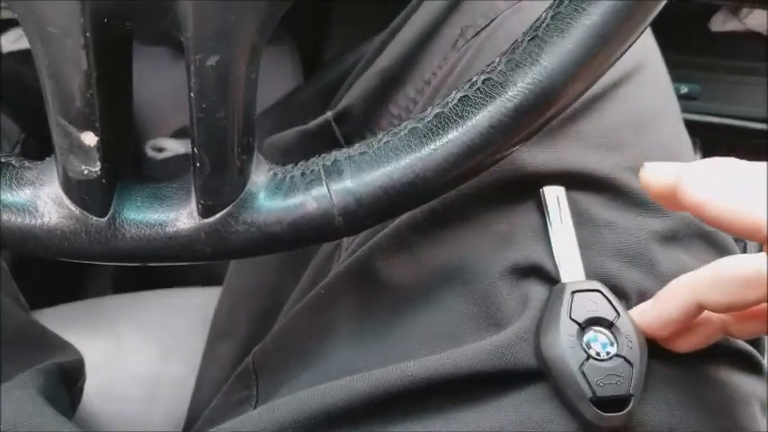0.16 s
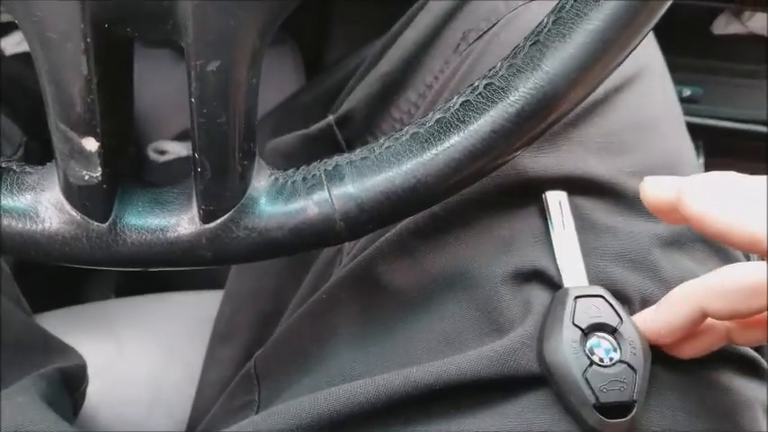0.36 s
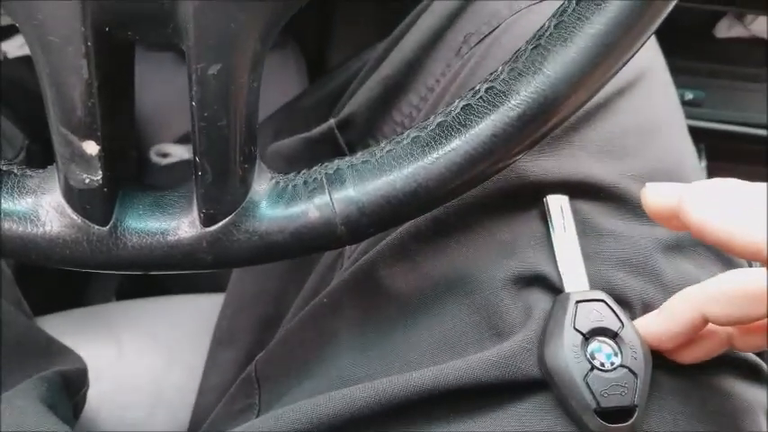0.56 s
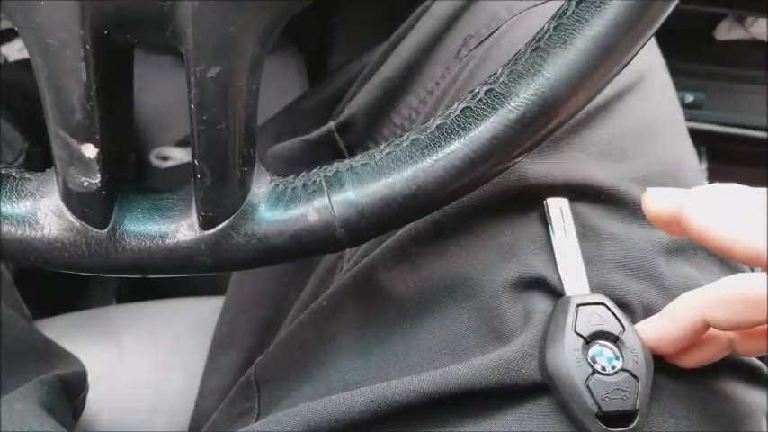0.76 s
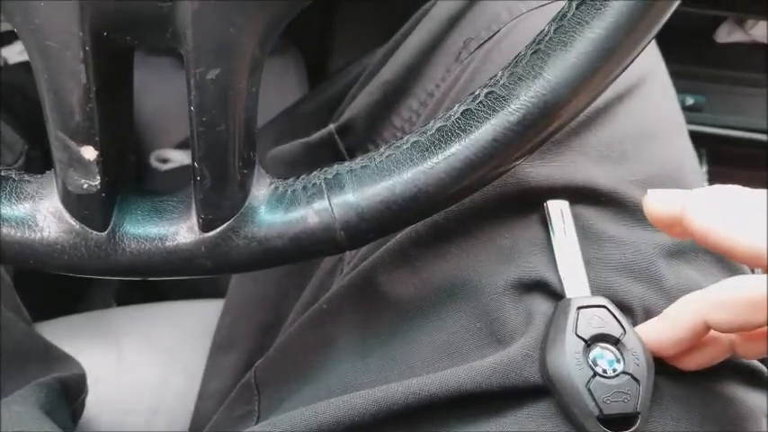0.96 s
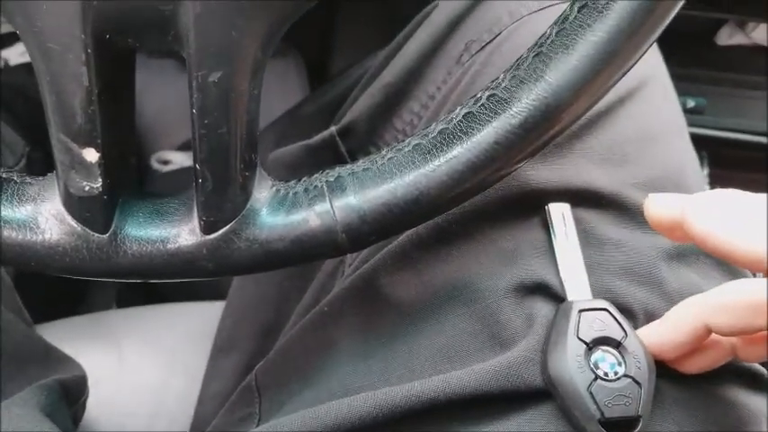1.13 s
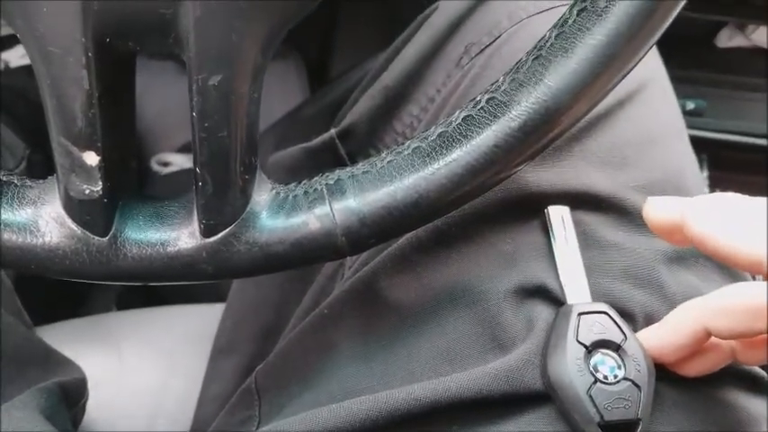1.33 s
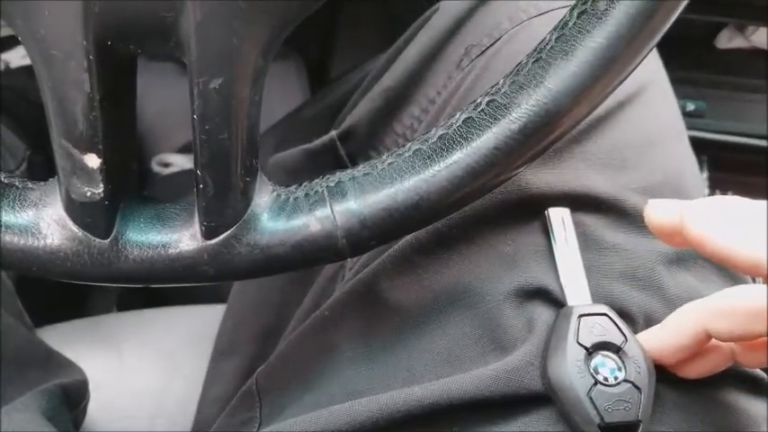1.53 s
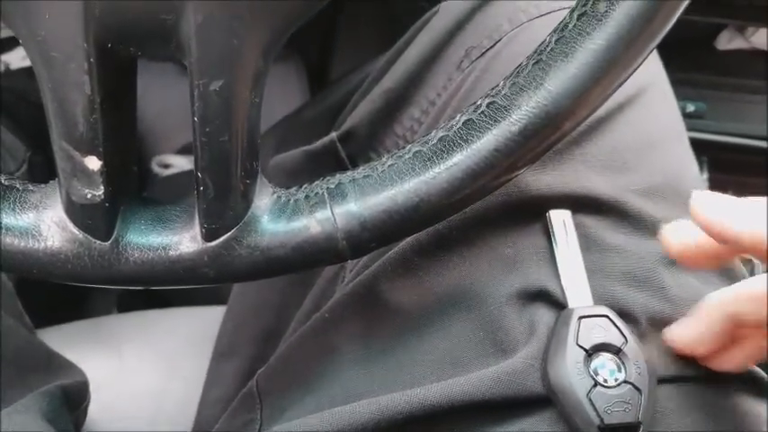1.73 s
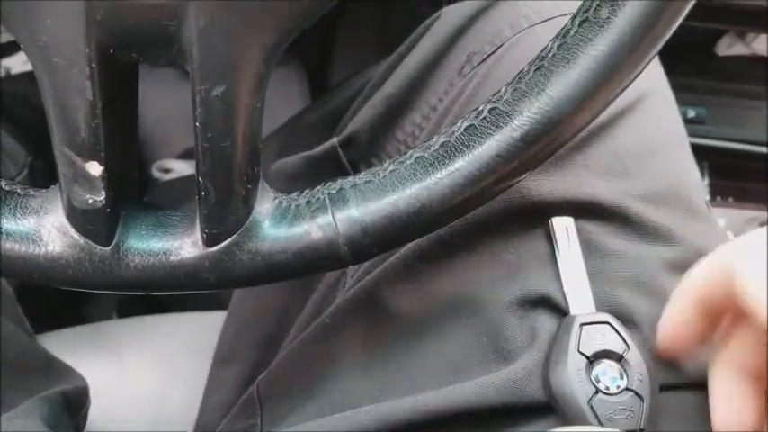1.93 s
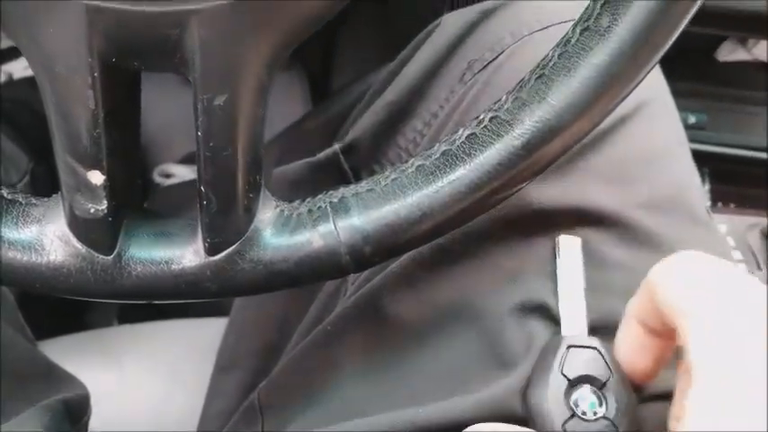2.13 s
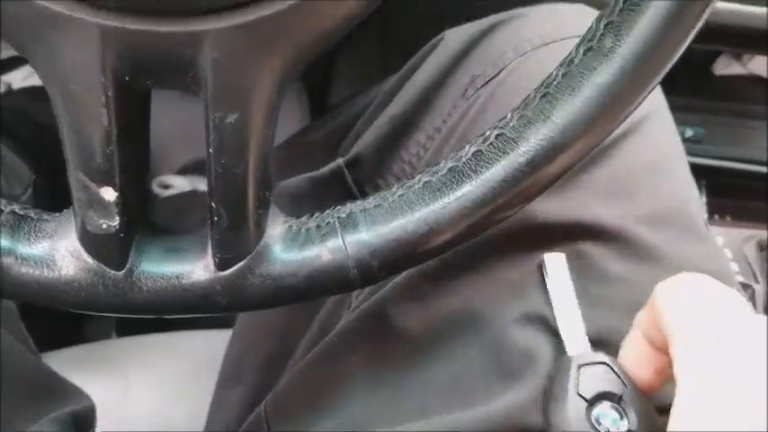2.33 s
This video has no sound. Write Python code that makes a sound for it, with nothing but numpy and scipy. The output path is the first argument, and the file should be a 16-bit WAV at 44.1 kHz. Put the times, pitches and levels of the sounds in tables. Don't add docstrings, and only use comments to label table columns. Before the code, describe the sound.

Car central locking heard inside the parked cabin: faint relay clicks, a brief motor whirr and hard overlapping latch clunks with a door-panel boom, two small clicks, then close cloth rustling and a light key tap.

```python
import sys
import numpy as np
from scipy import signal
from scipy.fft import rfft, irfft, next_fast_len
from scipy.io import wavfile
from scipy.ndimage import uniform_filter1d, map_coordinates

SR = 44100
rng = np.random.default_rng(int(sys.argv[2]) if len(sys.argv) > 2 else 0)


def elevation(decibels):
    levels = np.asarray(decibels, float)
    return 10 ** (levels / 20)


def put_to_file(sound):
    columns = np.atleast_2d(sound).T
    safe = np.clip(columns, -1, 1)
    whole_steps = np.round(safe * 32767)
    wavfile.write(sys.argv[1], SR, whole_steps.astype(np.int16))


N = 109809
SIDES = np.array([[.5], [-.5]])
TOP_HZ = 15850
LEAD_S = 0.000345

# freq_hz, level_db (per Hz)
RUMBLE = [(30, -14), (55, 2.5), (85, -1.5), (118, -1), (170, -3), (230, -15), (450, -17), (800, -44)]
HISS = [(500, -3), (1500, -1), (2500, -3), (6000, -6), (10000, -6.5), (13500, -1.5), (15500, -6)]
# freq_hz, likeness (-1 to 1)
RUMBLE_ALIKE = [(60, 0.9), (180, 0.88), (550, 0.38), (1650, -0.01), (4970, -0.1), (15000, -0.14)]
# freq_hz, left_over_right_db
RUMBLE_LEFT = [(50, 4.5), (115, -0.5), (190, 6.5), (330, -1), (600, 3.5)]

# start_s, rub_db, press_db, left_over_right_db
STROKES = [
    [(1.52, -88.5, -6, 3), (1.562, -75, -13, 6), (1.6, -53.5, -32.5, 4), (1.62, -53.5, -16, 5),
     (1.682, -54, -13, 5), (1.722, -76.5, -8, 7.5), (1.78, -92, -13, -1)],
    [(1.8, -81, -9, -4), (1.804, -94, 3, 9), (1.846, -57.5, -17.5, 4.5), (1.916, -58.5, -23.5, 9.5),
     (1.934, -65.5, -12, 8.5), (1.952, -52.5, -16.5, 6), (2.012, -57, -11, 11.5), (2.08, -70.5, -10, 4.5)],
    [(2.08, -78, -7, 13), (2.108, -62, -15, 8), (2.196, -55.5, -2, 12.5), (2.224, -57, -4, 10.5),
     (2.312, -54.5, -7.5, 12), (2.384, -55.5, -11.5, 6.5), (2.436, -62, -33, 11), (2.49, -72.5, -1, 1.5)],
]
# freq_hz, level_db (per Hz)
BRUSH = [(500, -14), (1300, -15), (2500, -11), (3800, -0.5), (6000, -0.5), (10300, -3.5), (12500, -22.5)]
DRAG = [(900, -75), (1350, 2), (2200, 1.5), (3500, -3), (5000, -22)]
SHEEN = [(9000, -29), (11500, 0.5), (15000, -0.5)]
# freq_hz, left_over_right_db
BRUSH_LEFT = [(600, -0.5), (1700, 9), (2600, 6), (4300, 11), (6000, 3.5), (10000, -3), (12000, 10.5),
              (14500, 20)]

# start_s, level_db, tilt_db_per_octave, ring_db, t60_s
NUDGES = [
    (1.693, -71, -3, -14.5, 0.063),
    (1.842, -71, -1, 2.5, 0.26),
]
# freq_hz, level_db, t60_s
KEY = [(730, 1.5, .14), (782, 0, 0.1), (1730, 4, 0.076)]
# start_s, level_db, tilt_db_per_octave, ring_db, t60_s
CLICKS = [
    [(.1, -53.5, -1.26, -9.5, 0.2), (.128, -59, -2.5, -23, 0.156), (.368, -62, 1, -37, 0.035)],
    [(1.099, -52, -1.5, -9, 0.16)],
    [(1.127, -47, -5, -12, 0.11)],
]
# freq_hz, level_db, t60_s
RELAYS = [
    [(963, 9, .06), (2330, 1, 0.097), (2860, 1, 0.062), (3660, 1.5, 0.032), (7140, 4, 0.04)],
    [(1300, 3, 0.057), (2450, 8, 0.057), (2580, 12, 0.076), (3640, -15, 0.039), (5380, -4.5, 0.075),
     (7530, -4.5, 0.074)],
    [(600, 10.5, 0.054), (1270, 7.5, 0.073), (1550, 6, 0.053), (2620, 1, 0.11), (1030, -9, .04)],
]
# freq_hz, level_db (per Hz)
TICK = [(300, 1), (1000, -5), (3500, -14), (4300, -16), (10000, -20), (14500, -11.5)]

# start_s, level_db, tilt_db_per_octave, ring_db, t60_s
JOLTS = [
    (.604, -48.5, -1, -33, 0.19),
    (.614, -39.5, -3.5, -0.5, .2),
    (.625, -39, -4, -10, 0.11),
    (.648, -45, -5, -21.5, 0.75),
    (.739, -37, -7.5, -7.5, 0.14),
]
# freq_hz, level_db, t60_s
GEARS = [(480, 0.5, .05), (890, -4.5, 0.035), (1340, 3, .03), (1660, 5.5, 0.028), (1950, -3, 0.039),
         (2330, -0.5, 0.014)]

# start_s, main_hz, main_db, upper_db, free_ringing_s
PUSHES = [(-.03, 184.5, -40.5, -69, 0.32), (0.093, 192.5, -37, -55, 0.037), (0.128, 169, -56, -53.5, 0.078),
          (0.613, 174, -34.5, -47.5, 0.027), (0.646, 186.7, -38, -58, 0.034),
          (0.675, 195, -21, -34.5, .026), (.704, 184, -36, -39, 0.12), (.744, 189.6, -39, -31, 0.026),
          (.764, 163.5, -32, -34, 0.034), (0.798, 200.2, -31.5, -29, 0.054),
          (.835, 179.7, -37.5, -43, 0.043), (0.937, 206, -49.5, -64, 0.021),
          (0.973, 176.6, -49, -67.5, 0.03), (1.096, 190.4, -39, -51, 0.023),
          (1.107, 187, -38.5, -48, 0.018), (1.134, 175.7, -44.5, -55.5, 0.041)]
# freq_hz, level_db, t60_s
LOW_MODES = [(73, -12, 0.16), (111.4, 6, 0.09)]
UPPER_MODES = [(360.6, 1.5, 0.19), (487.2, 1, 0.067), (650, -4, 0.063), (694, -7.5, 0.03)]

# start_s, level_db, tilt_db_per_octave, ring_db, t60_s
BLOWS = [
    [(.673, -30.5, -1, 0.5, 0.1), (.689, -42, 2, -5.5, .09)],
    [(.745, -20, -1, -4, 0.071), (.755, -30.5, 2, -17, 0.088), (.764, -38, -2.5, -6.5, 0.14)],
    [(.799, -28, 0, -1.5, 0.084), (.857, -41, -9, -7, 0.064)],
]
# freq_hz, level_db, t60_s
LATCHES = [
    [(470, -2, 0.11), (667, -4.5, .05), (1055, -16, 0.075), (1574, -5.5, 0.024), (1589, 5, 0.059),
     (2440, -19, .1), (3505, -3.5, 0.064), (4802, -23.5, .07), (5534, -10, 0.06), (7140, -15, 0.06)],
    [(704, -5.5, 0.056), (1066, -5.5, .06), (1263, 2, 0.041), (1590, -0.5, 0.049), (1703, -0.5, 0.07),
     (1810, -12, .06), (2080, -8.5, .04), (3187, -15.5, .07), (3480, 6.5, 0.023), (4340, -9, .06),
     (4818, -2.5, 0.037), (6220, -15.5, 0.079)],
    [(774, -3, 0.078), (1090, -6, 0.049), (1579, 3, 0.039), (1780, -12.5, 0.085), (2220, -22, 0.089),
     (2870, -20, 0.057), (3220, -9, 0.028), (3410, -16, .04), (5362, -19, 0.078), (5980, -24.5, 0.08)],
]
MUFFLED_DB = [-7, 0.5, -3.5]
# freq_hz, level_db (per Hz)
CLATTER = [(250, -1), (550, -4), (1300, 0), (2300, -7), (4700, -10.5), (8500, -15.5), (10800, -25),
           (15000, -23.5)]
# freq_hz, left_over_right_db
LATCH_LEFT = [(300, -3), (900, 0), (1250, 5), (1700, 4), (2500, 4), (4400, 3.5), (9500, -4), (14000, 9.5)]
RING_LEFT = [(480, 2), (720, 3.5), (1180, -7.5), (1570, 6.5), (2000, 10.5), (2600, 2), (3500, 13),
             (4900, 0.5)]
# freq_hz, likeness (-1 to 1)
LATCH_ALIKE = [(250, 1), (500, 0.98), (1300, 0.73), (2500, 0.18), (6000, 0.22)]
# freq_hz, lead_radians
LATCH_TURN = [(480, 1), (700, 1.7), (1066, 2.5), (1560, 0.25), (1700, 3.2), (2600, -2.25), (3050, 0.5),
              (5000, 2.1)]

# freq_hz, t60_s
ECHO = [(100, 0.55), (200, 0.36), (350, 0.23), (600, 0.2), (2000, 0.14), (8000, 0.11)]


def unit(x):
    return x / np.sqrt(np.mean(x ** 2) + 1e-20)


def along(points, hz):
    f, v = np.transpose(points)
    return np.interp(np.log(hz + 1), np.log(f + 1), v)


def wobble(rate, size):
    knots = rng.standard_normal(int(size / SR * 2000) + 9)
    return map_coordinates(knots, [np.arange(size) * min(rate, 1900) / SR])


def noise(size, spectrum, alike, left, tilt_db=0, lead=0):
    m = next_fast_len(size + 4096)
    hz = np.fft.rfftfreq(m, 1 / SR)
    a, b = rfft(rng.standard_normal((2, m)))
    u = np.arccos(np.clip(along(alike, hz), -1, 1)) / 2
    low_edge = [(spectrum[0][0] / 2, -120)]
    high_edge = [(TOP_HZ, spectrum[-1][1]), (TOP_HZ + 300, -120)]
    colour_db = along(low_edge + list(spectrum) + high_edge, hz)
    gain = elevation(colour_db + tilt_db * np.log2((hz + 1) / 2000) + SIDES * along(left, hz))
    advance = np.exp(2j * np.pi * hz * SIDES * lead)
    pair = np.cos(u) * a + 2 * SIDES * np.sin(u) * b
    return unit(irfft(gain * advance * pair, m)[:, :size])


def patchy(x, depth_db):
    z = signal.stft(x, nperseg=512)[2]
    field = uniform_filter1d(rng.standard_normal(z.shape), size=10, axis=1)
    field = uniform_filter1d(field, size=10, axis=2)
    return unit(signal.istft(z * elevation(depth_db * unit(field)), nperseg=512)[1][:, :N])


def add(out, s, sound):
    i = round((s + 1) * SR)
    out[:, i:i + sound.shape[1]] += sound


def ringing(modes, t, phase, scatter_db):
    total = 0
    for k, (hz, db, t60) in enumerate(modes):
        total = total + elevation(db + scatter_db[k] - 60 * t / t60) * np.sin(2 * np.pi * hz * t + phase[k])
    return total


def strikes(rows, colour, modes, rise_s, rattle_db):
    ring_rise_s, high_dies = 0.0037, 0.13
    out, t = np.zeros((2, N + 2 * SR)), np.arange(SR // 4) / SR
    hz = np.array([m[0] for m in modes])
    for s, db, tilt_db, ring_db, t60 in rows:
        burst = noise(len(t), colour, LATCH_ALIKE, LATCH_LEFT, tilt_db, LEAD_S)
        burst = burst * elevation(rattle_db * wobble(350, len(t)))
        dull = uniform_filter1d(burst, size=5, axis=1)
        burst = dull + (burst - dull) * elevation(-60 * t * high_dies / t60)
        burst = burst * elevation(-60 * t / t60) * (1 - np.exp(-t / rise_s))
        phase = rng.uniform(0, 2 * np.pi, len(hz))
        ring = []
        for side in SIDES[:, 0]:
            level_db = side * along(RING_LEFT, hz) + rng.normal(0, 2.0, len(hz))
            ring.append(ringing(modes, t, phase + side * along(LATCH_TURN, hz), level_db))
        ring = np.array(ring) * (1 - np.exp(-(t / ring_rise_s) ** 2))
        add(out, s, elevation(db) * (burst + elevation(ring_db) * ring))
    return out[:, SR:SR + N]


def cabin():
    rumble_db, hiss_db = -66, -76.5
    stir_db, stir_from_s, stir_rise_s = 4, 1.86, 0.14
    t = np.arange(N) / SR
    lift_db = stir_db * np.clip((t - stir_from_s) / stir_rise_s, 0, 1) + 0.5 * wobble(9.38, N)
    rumble = noise(N, RUMBLE + [(1400, -68)], RUMBLE_ALIKE, RUMBLE_LEFT)
    hiss = noise(N, HISS, [(1000, 0.035)], [(1000, 0.5), (1700, 4), (2500, 1.5), (8000, 0.76)])
    return elevation(rumble_db + lift_db) * rumble + elevation(hiss_db) * hiss


def cloth():
    brush_db, patchy_db, fibre_db = -0.5, 2.5, 0.5
    drag_db, drag_left_db = -0.5, 24
    sheen_db, sheen_fades = -3, 0.15
    s, *cols = np.concatenate(STROKES).T
    t = np.arange(N) / SR
    rub_db, press_db, pan_db = [np.interp(t, s, c) for c in cols]
    fibres = elevation(fibre_db * wobble(600, N) + 0.4 * wobble(30, N))
    brush = elevation(brush_db) * patchy(noise(N, BRUSH, [(1000, 0.067)], BRUSH_LEFT), patchy_db)
    sheen = noise(N, SHEEN, [(1000, 0.092)], BRUSH_LEFT)
    sheen = elevation(sheen_db - sheen_fades * (press_db + 14.0)) * sheen
    drag = elevation(drag_db + press_db) * noise(N, DRAG, [(1000, 0.22)], [(1000, drag_left_db)])
    return elevation(rub_db + SIDES * (pan_db - 5.5)) * fibres * (brush + sheen + drag) * (t >= s[0])


def key():
    return strikes(NUDGES, TICK, KEY, rise_s=0.0025, rattle_db=1.1)


def relays():
    return sum(strikes(rows, TICK, modes, rise_s=0.0025, rattle_db=1.1) for rows, modes in zip(CLICKS, RELAYS))


def motors():
    return strikes(JOLTS, CLATTER, GEARS, rise_s=0.0049, rattle_db=1.5)


def panel():
    main_t60_s, damped_t60_s, swell_s = 0.35, 0.012, 0.0081
    left_db, scatter_db = 4, 1.5
    sag_hz_per_s = 350
    low_db = -21.5
    thud_s, thud_db = .742, -29
    out, t = np.zeros((2, N + 2 * SR)), np.arange(SR // 2) / SR

    def ring(modes, lead=0):
        phase = rng.uniform(0, 2 * np.pi, len(modes))
        return ringing(modes, t + SIDES * lead, phase, rng.normal(0, scatter_db, len(modes)))

    swell = elevation(SIDES * left_db) * (1 - np.exp(-(t / swell_s) ** 2))
    for s, hz, main_db, upper_db, free in PUSHES:
        sag_hz = sag_hz_per_s * np.minimum(t, free) * (free < .1) / 2
        main = elevation(-60 * t / main_t60_s) * np.sin(2 * np.pi * (hz - sag_hz) * t)
        boom = elevation(main_db) * (main + elevation(low_db) * ring(LOW_MODES))
        boom = boom + elevation(upper_db) * ring(UPPER_MODES, LEAD_S)
        add(out, s, swell * boom * elevation(-60 * np.maximum(t - free, 0) / damped_t60_s))
    add(out, thud_s, swell * elevation(thud_db) * ring(LOW_MODES))
    return out[:, SR:SR + N]


def latches():
    muffled_hz = 8000
    out = np.zeros((2, N))
    for rows, modes, top_db in zip(BLOWS, LATCHES, MUFFLED_DB):
        colour = [(f, db + top_db * (f > muffled_hz)) for f, db in CLATTER]
        out += strikes(rows, colour, modes, rise_s=0.0023, rattle_db=2)
    return out


def echo(x):
    echo_db = -13
    hz, t, z = signal.stft(rng.standard_normal((2, SR // 2)), SR, nperseg=256)
    tail = signal.istft(z * elevation(-60 * t / along(ECHO, hz)[:, None]), SR, nperseg=256)[1]
    return signal.fftconvolve(x, elevation(echo_db) * tail / np.linalg.norm(tail[0]), axes=1)[:, :N]


def scene():
    struck = key() + relays() + motors() + panel() + latches()
    return cabin() + cloth() + struck + echo(struck)


def top_cut(x):
    return signal.sosfilt(signal.butter(12, 16800, fs=SR, output="sos"), x)


def record(dry):
    m = next_fast_len(N)
    limited = irfft(rfft(dry, m) * (np.fft.rfftfreq(m, 1 / SR) < TOP_HZ), m)[:, :N]
    return top_cut(limited)


dry = scene()
out = record(dry)
put_to_file(out)
```